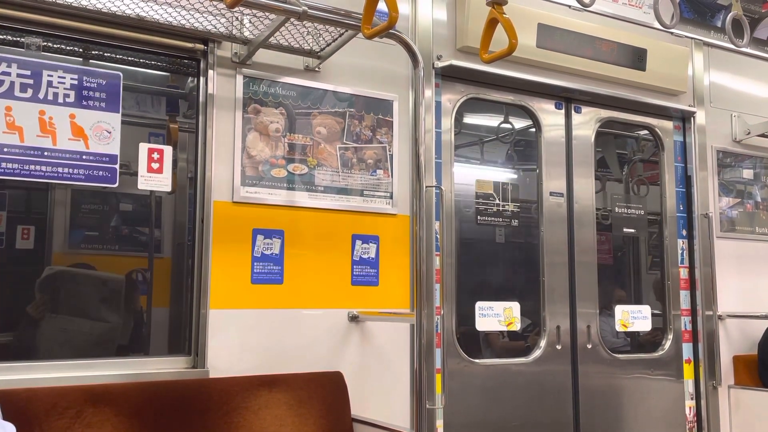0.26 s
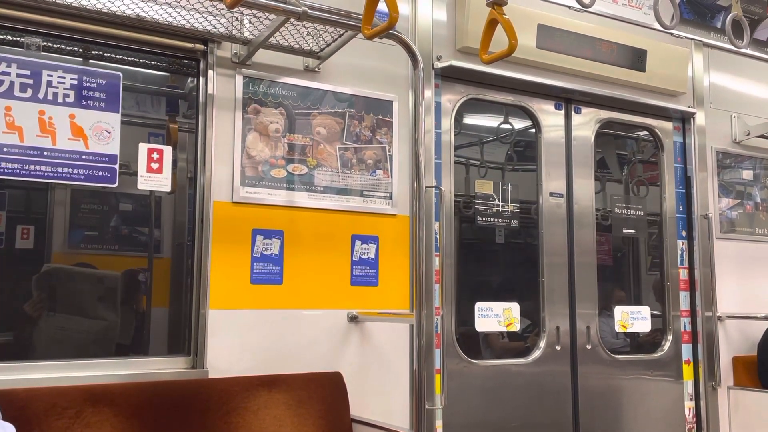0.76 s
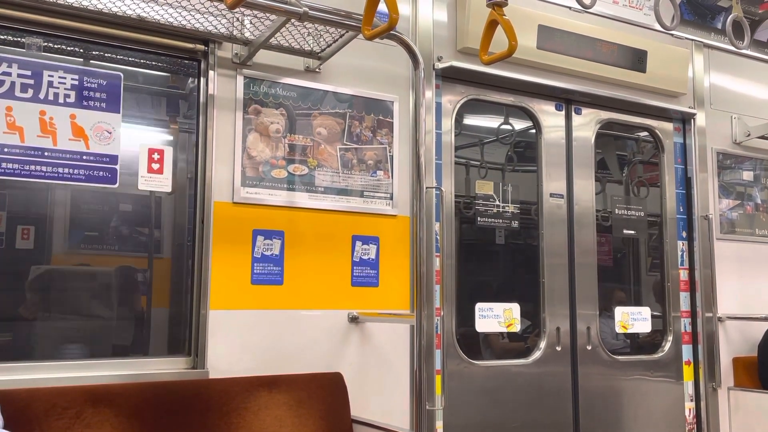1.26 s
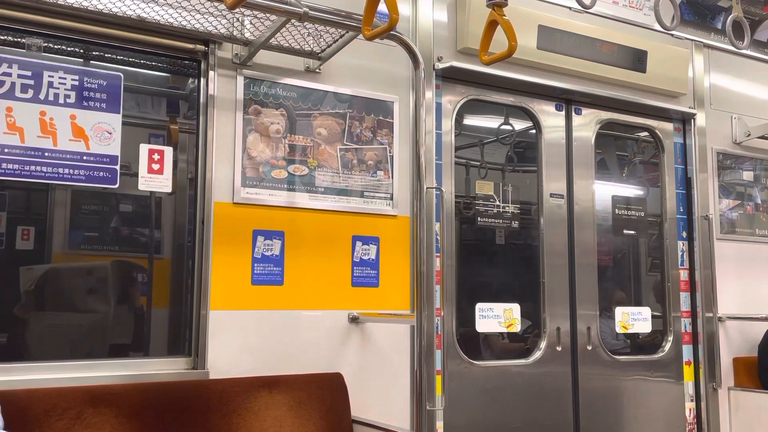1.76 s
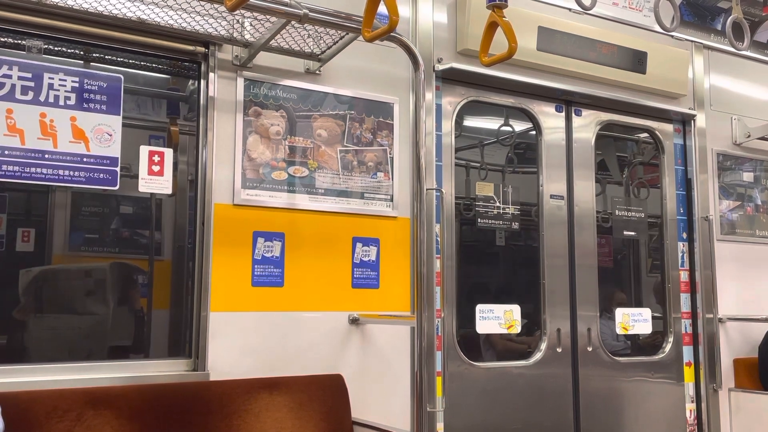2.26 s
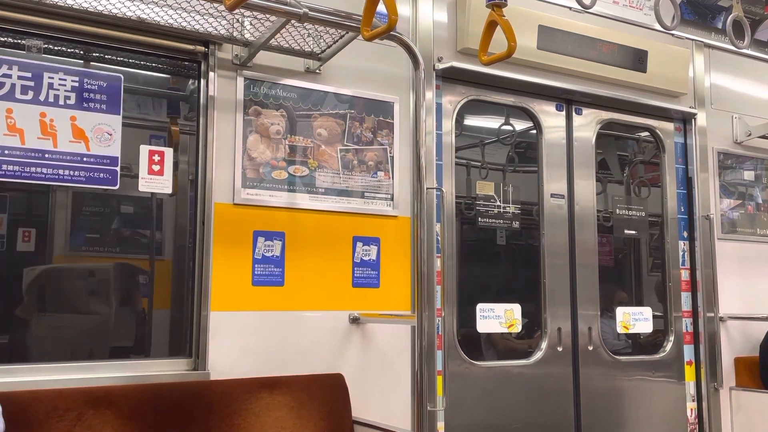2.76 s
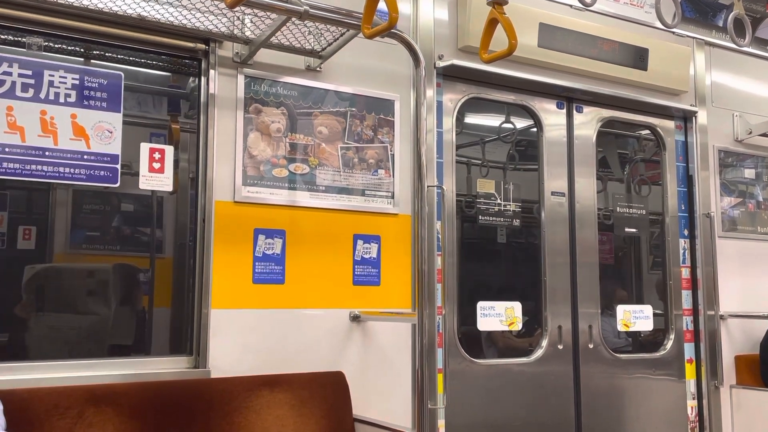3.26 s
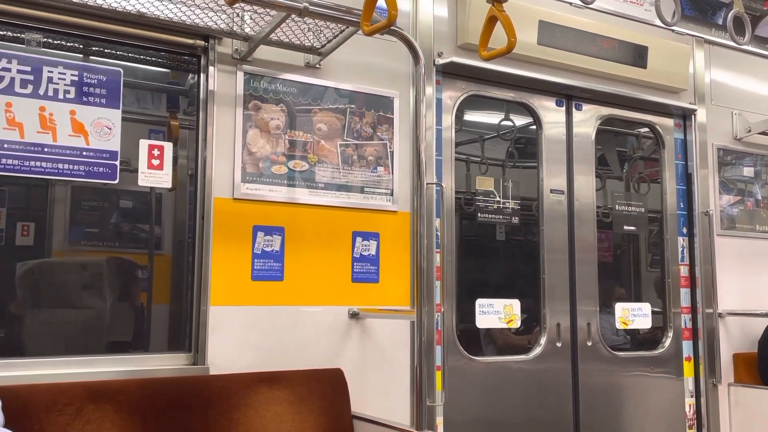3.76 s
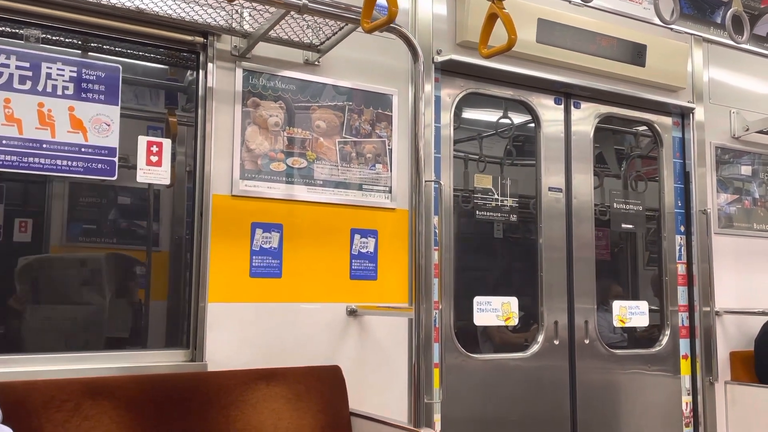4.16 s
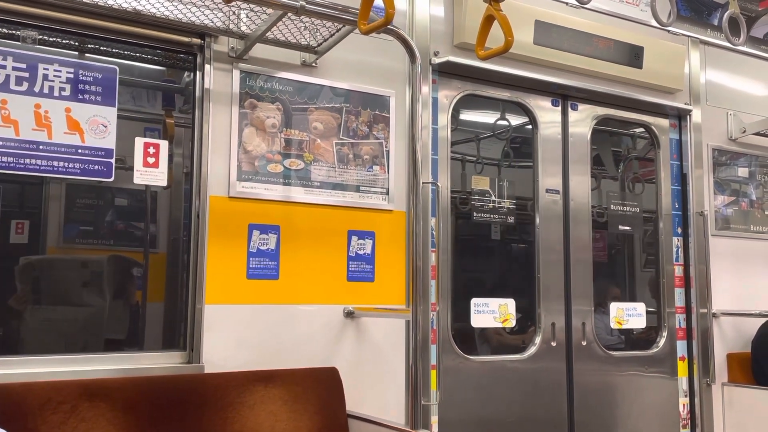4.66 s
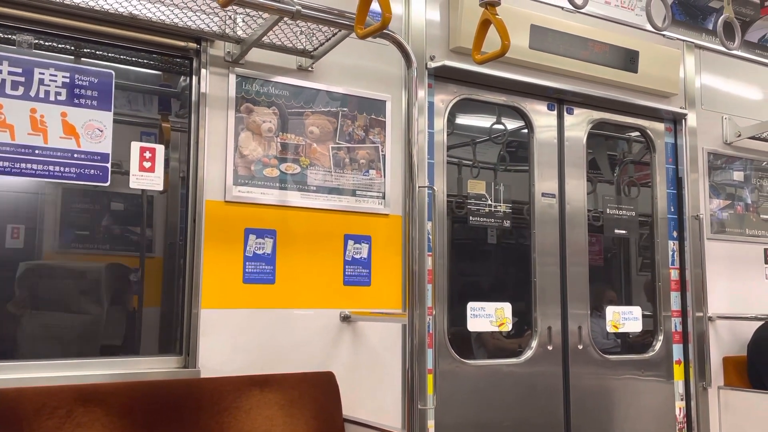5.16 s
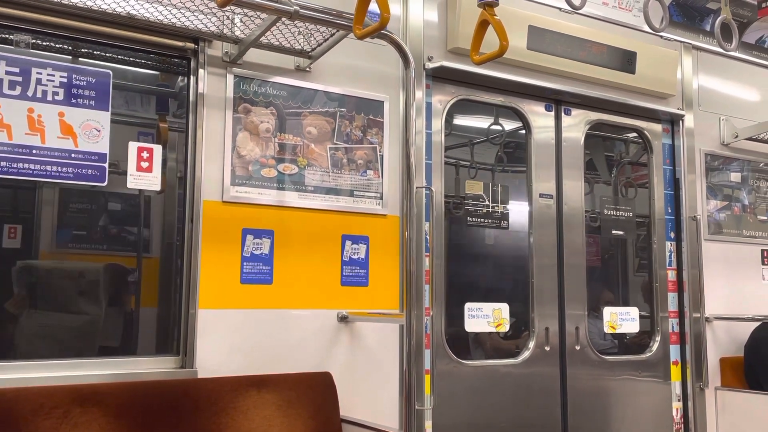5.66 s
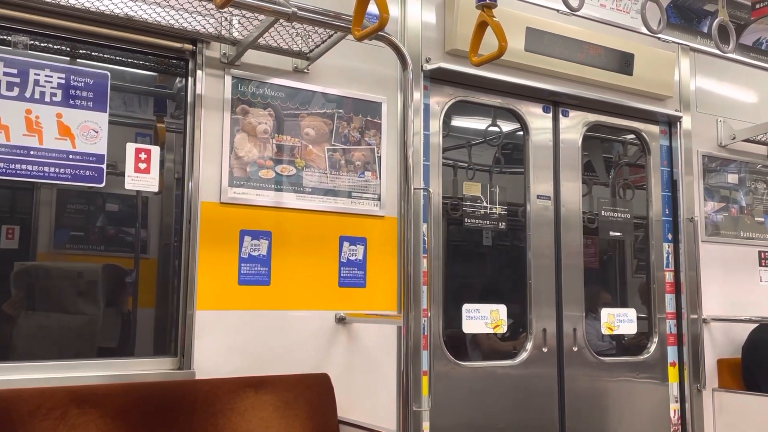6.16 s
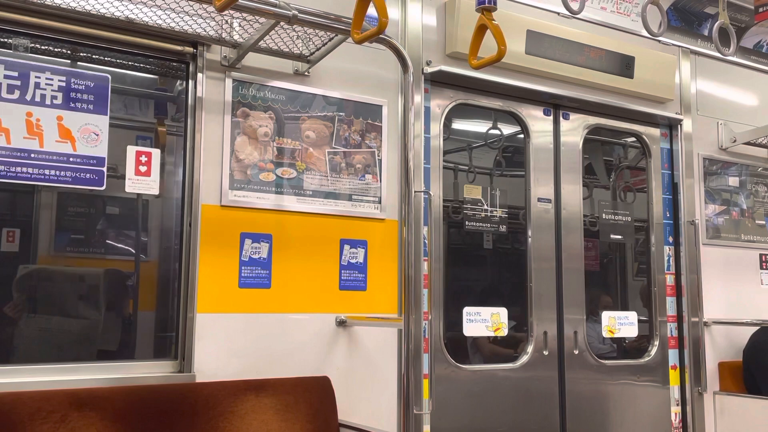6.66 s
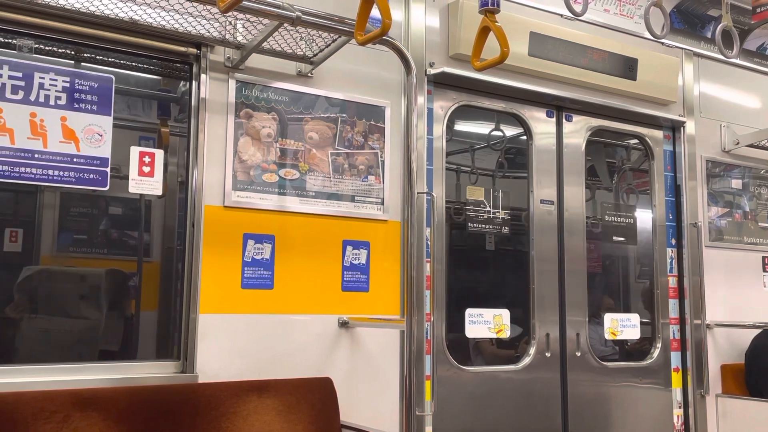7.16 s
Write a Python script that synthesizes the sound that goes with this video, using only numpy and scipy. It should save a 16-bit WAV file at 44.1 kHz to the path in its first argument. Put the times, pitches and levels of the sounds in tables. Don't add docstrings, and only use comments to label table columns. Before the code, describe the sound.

Inside a moving subway car in a tunnel, deep body rumble, beating low hum and soft vent hiss run continuously. Wheel roar grows from about three seconds, turns loud and raspy through a bend, then drops near six. Short trim squeaks, dull rail-joint thuds and two quick air-valve hisses punctuate it. Close, enclosed stereo perspective from a handheld phone.

```python
import sys
import numpy as np
from scipy import signal
from scipy.fft import rfft, irfft, next_fast_len
from scipy.io import wavfile
from scipy.ndimage import uniform_filter1d

SR = 44100
rng = np.random.default_rng(int(sys.argv[2]) if len(sys.argv) > 2 else 0)


def master_out(mix):
    frames = np.transpose(np.atleast_2d(mix))
    ceiling = np.clip(frames, -1, 1)
    pcm = np.round(ceiling * 32767).astype(np.int16)
    wavfile.write(sys.argv[1], SR, pcm)


def how_loud(loudness_db):
    steps = np.asarray(loudness_db, float) / 20
    return 10 ** steps


N = 326763
T = np.arange(N) / SR
SIZE = next_fast_len(N)
HZ = np.arange(SIZE // 2 + 1) * SR / SIZE + 1e-3


def over_hz(table, col=1):
    rows = np.array(table, float)
    return np.interp(np.log(HZ), np.log(rows[:, 0]), rows[:, col])


def over_time(table):
    s, *cols = np.transpose(table)
    return [np.interp(T, s, c) for c in cols]


def walk(rate):
    hold = int(SR / rate)
    steps = np.repeat(rng.standard_normal(N // hold + 1), hold)
    return 1.3 * uniform_filter1d(uniform_filter1d(steps, hold), hold)[:N]


def tone(hz):
    return np.sin(2 * np.pi * np.cumsum(hz) / SR)


def noise(colour, modes=(), flicker_db=0., rate=8., count=1):
    low, high = colour[0][0], colour[-1][0]
    db = over_hz(colour)
    for hz, width, gain_db in modes:
        db = db + gain_db / (1 + (2 * (HZ - hz) / width) ** 2)
    db = db - 120 * np.abs(np.log2(HZ / np.clip(HZ, low, high)))
    spec = rfft(rng.standard_normal((2, SIZE))) * how_loud(db)
    place = np.clip(np.log(HZ / low) / np.log(high / low), 0, 1) * (count - 1)
    out = np.zeros((2, N))
    for k in range(count):
        band = np.cos(np.pi / 2 * np.clip(place - k, -1, 1)) ** 2
        out += irfft(spec * band, SIZE)[:, :N] * how_loud(flicker_db * walk(rate))
    return out / np.sqrt(np.mean(out ** 2))


def cabin():
    # (frequency [Hz], density [dB per Hz])
    colour = [(18, -9), (70, -6), (200, -9.5), (500, -13), (1000, -22), (1550, -26), (2500, -30.5),
              (3000, -30.5), (3800, -35), (5500, -39), (7000, -44), (8400, -37.5), (10000, -48),
              (14600, -56.5)]
    return how_loud(-29) * noise(colour, flicker_db=1.0, rate=8.0, count=5)


def machines():
    compressor_hz, beat_null_s = (55.85, 57.94), .513
    # (time [s], slow one [dB], fast one [dB])
    compressor = [(0, -24.5, -27), (2, -25, -24.5), (4, -27.5, -21), (5.5, -27.5, -20.5), (7.41, -27, -20)]
    # (pitch [Hz], wander [Hz], level at start, middle, end [dB])
    shafts = [(48.2, 0.25, -63, -34, -38), (78.7, 0.43, -61, -44, -46), (91.9, 0.38, -26.5, -29.5, -34),
              (96.1, 0.41, -32.5, -31.5, -34), (114.3, 0.33, -29, -47, -52)]
    slow_db, fast_db = over_time(compressor)
    slow, fast = (np.sin(2 * np.pi * hz * (T - beat_null_s)) for hz in compressor_hz)
    out = how_loud(fast_db) * fast - how_loud(slow_db) * slow
    for hz, wander_hz, *db in shafts:
        level_db = np.interp(T, [0, T[-1] / 2, T[-1]], db) + 3.4 * walk(4.5)
        out = out + how_loud(level_db) * tone(hz + wander_hz * walk(1.527))
    return np.sqrt(2) * out


def panel_drone(load_db):
    level_db = 1.6 * (load_db - 9) - 27. + 3. * walk(12.)
    return how_loud(level_db) * tone(244 + 8. * walk(10.)) * np.array([[1], [.6]])


def running():
    # (time [s], level over the straight run [dB])
    bend = [(0, 1.5), (1.1, 0.5), (2.25, 1), (2.5, 2.5), (2.95, 3.5), (3.6, 5), (4.05, 9), (4.3, 8.5),
            (4.5, 9.5), (4.8, 8), (5.25, 11.5), (5.5, 9.5), (5.68, 10), (5.88, 7.5), (6.05, 1), (6.4, 2),
            (6.65, 2.5), (7.0, 2), (7.41, 0.5)]
    # (middle [s], length [s], level [dB])
    rough_rail = [(1.14, .2, 3), (2.97, .1, 2), (3.9, .15, 1.5), (4.47, .06, 3), (4.93, .1, 4.5),
                  (5.24, .08, 2.5), (5.64, .1, 2), (6.83, .15, 4), (7.17, .08, 7)]
    # (frequency [Hz], density [dB per Hz])
    boom_colour = [(38, -28), (50, -1.5), (70, 1.5), (82, -7), (97, -1.5), (125, -3.5), (160, -2),
                   (200, -6)]
    # (frequency [Hz], density [dB per Hz])
    roar_colour = [(130, -19), (190, -4.5), (320, -0.5), (390, -4), (530, -1), (620, -14.5), (800, -25)]
    # (frequency [Hz], width [Hz], gain [dB])
    roar_modes = [(249.6, 17.8, 9), (377.4, 19, 6.5), (458.7, 20, 5.5)]
    # (frequency [Hz], density [dB per Hz])
    rasp_colour = [(520, -16), (620, 1), (730, -3), (1000, -4.5), (1250, -11), (1700, -18), (2600, -21.5)]
    # (frequency [Hz], width [Hz], gain [dB])
    rasp_modes = [(1424, 62, 7.5), (735, 52, 5.5), (847, 39, 2.5)]
    # (frequency [Hz], density [dB per Hz])
    whine_colour = [(1500, -2), (1750, -1.5), (2100, 0.5), (2550, -4), (2900, -8.5)]
    # (frequency [Hz], width [Hz], gain [dB])
    whine_modes = [(1850, 130, 8), (2280, 90, 3), (2450, 150, 7)]
    load, = over_time(bend)
    rough = sum(db * np.exp(-(2 * (T - s) / length) ** 2) for s, length, db in rough_rail)

    def level(db, by_load, by_rough, drive=load):
        return db + by_load * drive + by_rough * rough

    boom_db = level(-27, 0.048, 0.15) + 0.5148 * T
    boom = how_loud(boom_db) * noise(boom_colour, flicker_db=1.5, rate=12., count=2)
    roar_db = level(-27, 0.96, 0.46)
    roar = how_loud(roar_db) * noise(roar_colour, roar_modes, flicker_db=.5, rate=7.1, count=3)
    rasp_full_db = 3.5
    rasp_db = level(-38.5, 2.4, 1.0, rasp_full_db * np.tanh(load / rasp_full_db))
    rasp = how_loud(rasp_db) * noise(rasp_colour, rasp_modes, flicker_db=1.2, rate=8., count=2)
    coast_s, coast_db_per_s = 4.3, -1.2
    whine_db = level(-41, 0.13, .3) + coast_db_per_s * np.maximum(T - coast_s, 0)
    whine = how_loud(whine_db) * noise(whine_colour, whine_modes, flicker_db=0.0, rate=12.0, count=2)
    load_db = uniform_filter1d(load, SR // 2)
    air = how_loud(0.17 * (load_db - load_db.mean())) * cabin()
    return boom + roar + rasp + whine + air + panel_drone(load_db)


def ripples():
    # (time [s], length [s], pitch [Hz], level [dB])
    stretches = [(3.0, 1.05, 380, -32), (2.4, 1.3, 810, -43), (3.9, .45, 750, -38), (5.55, .2, 480, -22.5),
                 (5.0, .35, 530, -28)]
    out = np.zeros(N)
    for s, length, hz, db in stretches:
        swell = np.sin(np.pi * np.clip((T - s) / length, 0, 1)) ** .5
        out += swell * how_loud(db + 4 * walk(25.)) * tone(hz * (1 + .022 * walk(20.)))
    return np.sqrt(2) * out


def squeaks():
    # (time [s], length [s], pitch from [Hz], pitch to [Hz], level [dB])
    slips = [(4.865, .08, 700, 740, -29), (4.905, .085, 1400, 1450, -35.5), (5.243, .07, 1400, 1400, -37),
             (7.103, .052, 1930, 1950, -33.5), (7.122, .045, 5760, 5830, -55.5),
             (7.22, 0.04, 1950, 1930, -46), (5.66, 0.07, 2200, 2280, -38.5), (5.76, .07, 2240, 2320, -42),
             (3.8, 0.1, 2260, 2300, -47), (6.77, .1, 2400, 2400, -47)]
    out = np.zeros(N)
    for s, length, hz0, hz1, db in slips:
        part = np.clip((T - s) / length, 0, 1)
        waver = 1 + .16 * length * walk(90.)
        rub = tone((hz0 + (hz1 - hz0) * part) * waver)
        out += np.sqrt(2) * how_loud(db + 20. * length * walk(50.)) * np.sin(np.pi * part) ** 0.42 * rub
    return out


def thuds():
    # (time [s], peak [dB], pitch [Hz])
    joints = [(4.306, -11.5, 182), (7.15, -5, 140), (5.79, -18, 186), (7.335, -11, 178), (7.359, -8, 95)]
    rise_s, decay_s = 0.00087, 0.021
    out = np.zeros(N)
    for s, db, hz in joints:
        t = np.maximum(T - s, 0)
        out += how_loud(db) * np.sin(2 * np.pi * hz * t) * (1 - np.exp(-t / rise_s)) * np.exp(-t / decay_s)
    return out


def blow(s, rise_s, db):
    open_s, swell_db, fall_db_per_s, close_s = .018, 5.5, 70, .27
    t, late = T - s, T - s - rise_s
    shape_db = np.where(late < 0, swell_db * late / rise_s, -fall_db_per_s * late)
    gate = np.clip(t / open_s, 0, 1) * np.clip((close_s - late) / .06, 0, 1)
    return how_loud(db + np.minimum(shape_db, 0)) * gate


def valve():
    # (opens [s], time to full flow [s], full flow [dB], hose stretch [ratio])
    blows = [
        (5.536, 0.088, -39, 1.01),
        (6.705, 0.12, -46.5, 1.05),
    ]
    # (frequency [Hz], density [dB per Hz])
    hiss_colour = [(1500, -4), (2200, 0.5), (4500, -4.5), (7000, -7), (10000, -9), (13000, -14),
                   (15300, -26)]
    # (frequency [Hz], width [Hz], gain [dB])
    hose = [(2300, 200, 7), (3300, 300, 6), (4290, 300, 6), (5250, 400, 6), (6250, 220, 5), (7350, 220, 5),
            (8450, 300, 3), (9500, 300, 2), (10500, 300, 3)]
    # (frequency [Hz], density [dB per Hz])
    whistle_colour = [(10100, -17.5), (10560, 1), (11100, -8)]
    whistle = noise(whistle_colour, [(10562, 60, 6)], flicker_db=6.0, rate=30.)
    out = how_loud(-3.5) * blow(*blows[0][:3]) * whistle
    for s, rise_s, flow_db, stretch in blows:
        modes = [(hz * stretch, width, db) for hz, width, db in hose]
        out += how_loud(6.0) * blow(s, rise_s, flow_db) * noise(hiss_colour, modes, flicker_db=0.0, rate=23.0)
    return out


def scene():
    # (frequency [Hz], likeness [0-1], left leads by [rad], left minus right [dB])
    ports = [(60, .998, 0, 0), (130, .83, .1, .5), (280, .72, .4, 2), (600, .5, .8, 2), (1000, .4, .7, 2.5),
             (1800, .3, 0, 4), (2400, .8, .2, 2.5), (3500, .97, .1, .5), (5000, .99, 0, 0),
             (6300, .99, -.75, 0), (8350, .99, -np.pi, 0), (11850, .98, -2 * np.pi, 0),
             (14600, .98, -3 * np.pi, 0), (16000, .98, -3 * np.pi, 0)]
    single = machines() + squeaks() + thuds() + ripples()
    echo = np.roll(single, int(.011 * SR))
    shared, other = rfft(running() + valve() + np.array([single, echo]), SIZE)
    like = np.clip(over_hz(ports, col=1), 0, 1)
    mid = np.sqrt((1 + like) / 2) * shared
    side = np.sqrt((1 - like) / 2) * other
    tilt = how_loud(over_hz(ports, col=3) / 2) * np.exp(.5j * over_hz(ports, col=2))
    return irfft(np.array([(mid + side) * tilt, (mid - side) / tilt]), SIZE)[:, :N]


def roll_off(x):
    return signal.sosfilt(signal.butter(12, 15750, fs=SR, output="sos"), x)


def record(dry):
    mix = np.tanh(.3 * dry) / .3
    return roll_off(mix)


dry = scene()
out = record(dry)
master_out(out)
```